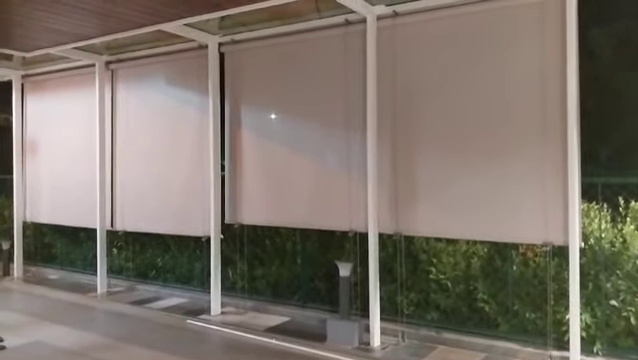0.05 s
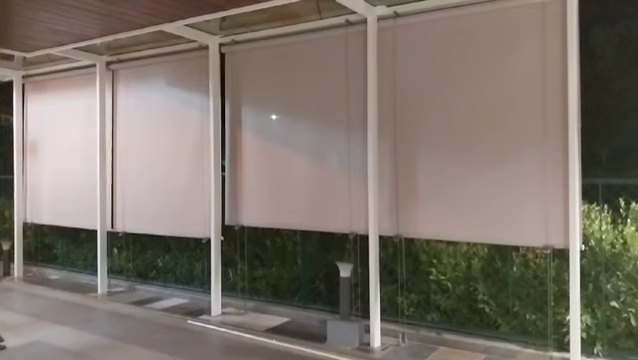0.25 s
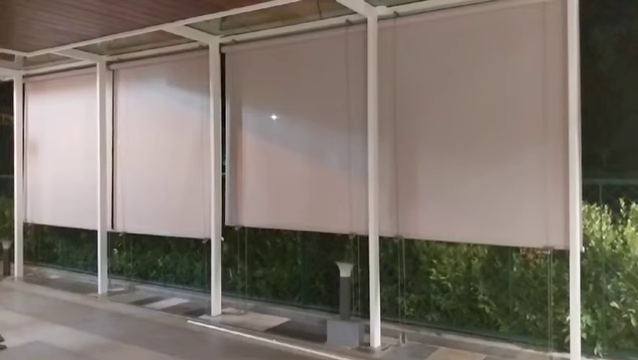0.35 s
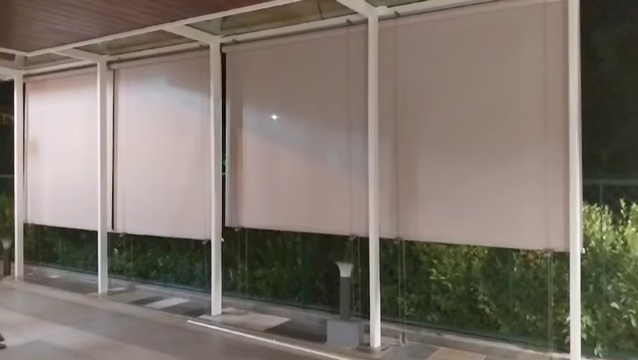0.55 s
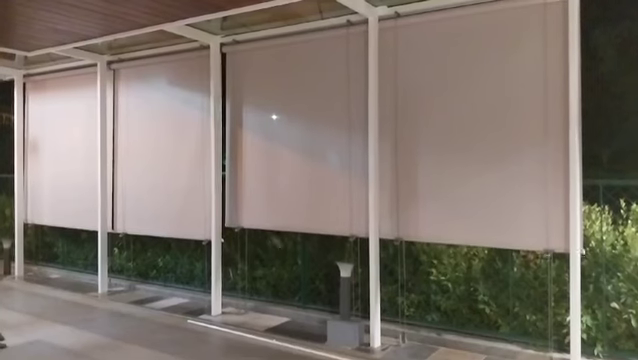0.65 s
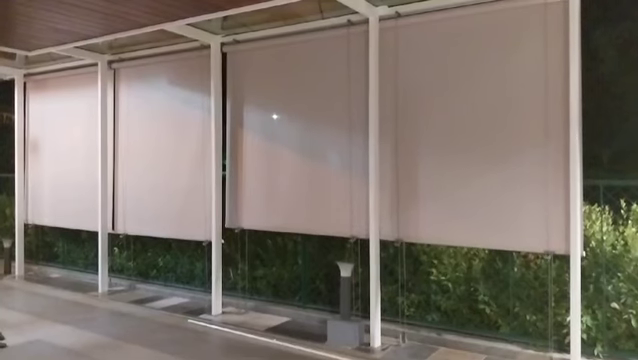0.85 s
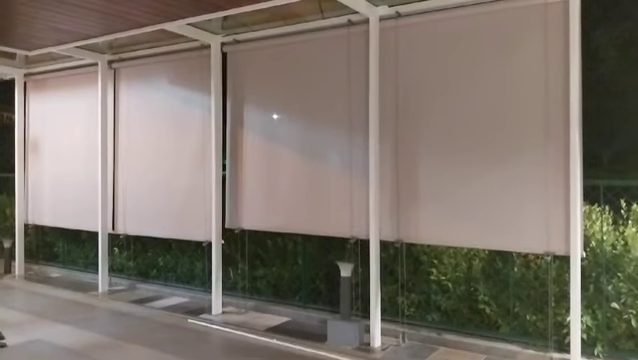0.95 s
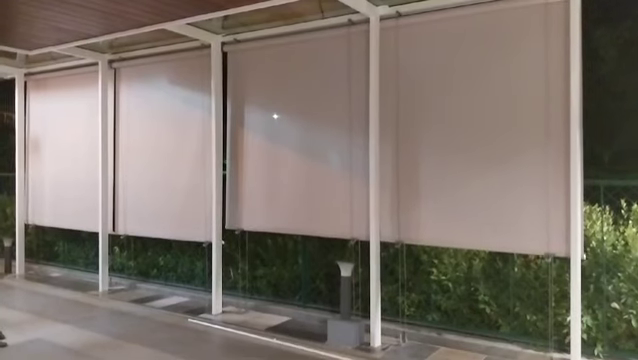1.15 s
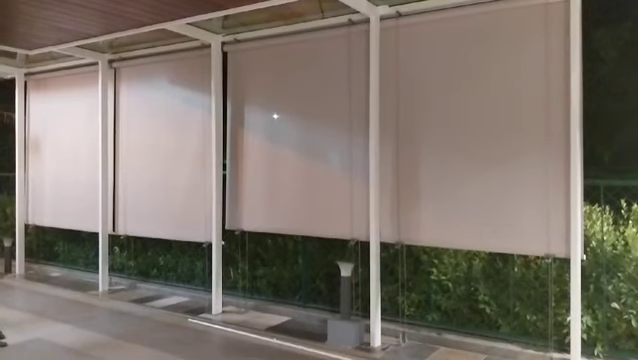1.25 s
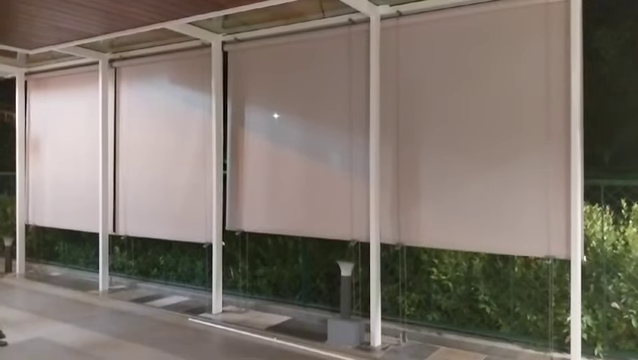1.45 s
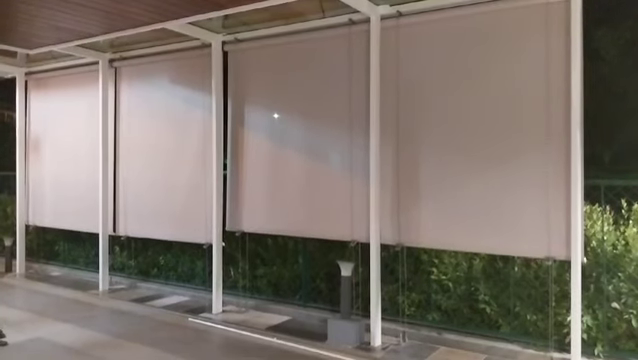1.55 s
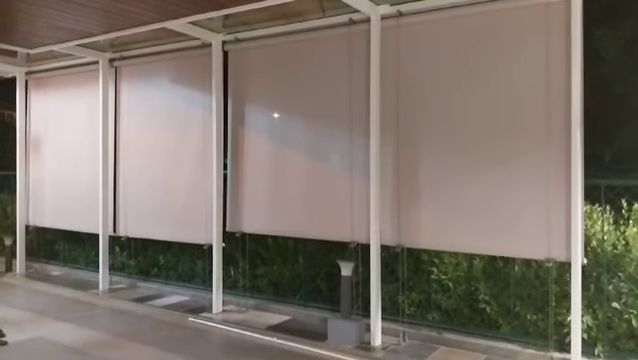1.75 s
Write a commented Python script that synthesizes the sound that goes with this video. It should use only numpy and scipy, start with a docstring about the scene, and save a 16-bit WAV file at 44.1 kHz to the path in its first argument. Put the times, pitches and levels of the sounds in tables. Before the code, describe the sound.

Crickets chirp fast and steadily at night, left of a covered patio, two close and more behind. Under them run a low town rumble and a faint, repeating frog-like call. Early on, the microphone takes one soft bump.

```python
"""Two near crickets chirp at night in a hedge to the left of a covered patio, each chirp a quick pair of
wing strokes that fall in pitch as the scraper slows along the file. Behind them are a chorus of their
kind, one thin, even trill and a dry scrape of wings. Through a low town rumble and airy hiss, something
far off (perhaps a frog) calls faintly. Once, a soft handling bump thuds in the right microphone."""
import sys
import numpy as np
from scipy import signal
from scipy.fft import rfft, irfft, next_fast_len
from scipy.io import wavfile
from scipy.ndimage import map_coordinates

SR = 44100
rng = np.random.default_rng(int(sys.argv[2]) if len(sys.argv) > 2 else 0)


def wav_out(sig):
    """Save sig, one row per channel (or a flat mono array), as 16-bit PCM at SR to the path in sys.argv[1]."""
    wavfile.write(sys.argv[1], SR, np.round(np.clip(np.atleast_2d(sig).T, -1, 1) * 32767).astype(np.int16))


N = 79380
T = np.arange(N) / SR


def amp(db):
    """Decibels to gain."""
    return 10 ** (np.asarray(db) / 20)


def unit(x):
    """Scale to rms 1."""
    return x / np.sqrt(np.mean(x ** 2) + 1e-20)


def wobble(rate):
    """A smooth random modulator, rate knots a second."""
    return map_coordinates(rng.standard_normal(8192), [T * rate], mode="wrap")


def filtered(x, response):
    """Filter x by a gain given as a function of frequency."""
    size = next_fast_len(N + SR // 2)
    return irfft(rfft(x, size) * response(np.fft.rfftfreq(size, 1 / SR)), size)[..., :N]


def coloured(x, eq):
    """Shape x with an EQ curve of (frequency [Hz], gain [dB]) points."""
    points_hz, db = np.transpose(eq)
    return filtered(x, lambda hz: amp(np.interp(np.log(hz + 1), np.log(points_hz), db)))


def noise(eq, alike=0):
    """Stereo noise of rms 1, coloured by eq; alike is the left-right correlation."""
    mid, side = coloured(rng.standard_normal((2, N)), eq)
    width = np.arccos(np.clip(alike, -1, 1)) / 2
    return unit(np.cos(width) * mid + np.sin(width) * np.array([side, -side]))


def cricket(first, rate, gap, start_hz, end_hz, stroke_s=.0165):
    """Two wing strokes a chirp; the tone falls as the scraper slows along the file."""
    song = np.zeros(N)
    rasp = .4 * wobble(800)  # fast phase jitter roughens the tone
    for k, (late, sharp, loud) in enumerate(rng.standard_normal((70, 3))):
        chirp, stroke = divmod(k, 2)
        start = first + chirp / rate + stroke * gap + .0006 * late
        span = slice(*np.searchsorted(T, [start, start + stroke_s]))
        progress = (T[span] - start) / stroke_s
        hz = (start_hz + (end_hz - start_hz) * progress) * (1 + .006 * sharp)
        phase = 2 * np.pi * np.cumsum(hz) / SR + rasp[span]
        swell = np.sin(np.pi * progress ** .85) ** 2
        tone = np.sin(phase) + amp(-46) * np.sin(2 * phase)
        song[span] += amp(1.5 * loud) * swell * tone
    return unit(song)


def patio(song, tail_db, tail_t60, early_db=-4, early_t60=.012):
    """Floor, blinds and roof add quick reflections and a short tail at each microphone."""
    t = T[:SR // 2]
    pre_rolled = np.pad(song, (len(t), 0), mode="wrap")
    wet = 0
    for db, t60 in (early_db, early_t60), (tail_db, tail_t60):
        impulse = rng.standard_normal((2, len(t))) * amp(-60 * t / t60)
        echo = signal.fftconvolve(pre_rolled[None], impulse, axes=1)
        wet += amp(db) * unit(echo[:, len(t):len(t) + N])
    return unit(song + wet)


# Foreground voices: (first chirp [s], chirp rate [1/s], stroke spacing [s], stroke start [Hz],
# stroke end [Hz], pre-EQ level [dB])
NEAR_CRICKETS = [(-.0095, 14.19, .022, 7150, 5450, -43.3), (-.0205, 15.68, .020, 7800, 7050, -52)]

def near_crickets():
    """Two crickets up front, with only a tight patio reverb."""
    return sum(amp(db) * patio(cricket(*voice), tail_db=-4, tail_t60=.09)
               for *voice, db in NEAR_CRICKETS)


def trill(hz=7037):
    """One thin, unbroken insect tone with a slight flutter."""
    tone = np.sin(2 * np.pi * hz * T + .6 * wobble(25))
    return amp(-59) * unit(tone * amp(.89 * wobble(40)))


def chorus(count=6, rate=14.6, start_hz=7350, end_hz=5950):
    """Farther crickets, each at its own pace and pitch, washed in patio reverb."""
    firsts = -(1 + rng.random(count)) / rate
    rates = rate * (1 + .057 * rng.standard_normal(count))
    detunes = 1 + .035 * np.linspace(-1, 1, count)
    songs = sum(cricket(first, pace, .022, start_hz * detune, end_hz * detune)
                for first, pace, detune in zip(firsts, rates, detunes))
    return amp(-45.5) * patio(unit(songs), tail_db=12, tail_t60=.47)


# Bright friction band of the wings: (frequency [Hz], gain [dB])
SCRAPE_EQ = [(3500, -72), (4900, -24.5), (5600, -2), (6500, -1.5), (7500, 5.5), (8300, -26.5), (9200, -13),
             (9600, -19.5), (10300, -42), (15000, -19)]

def wing_scrape():
    """The dry scrape of all the wings, blurred into steady noise."""
    return amp(-49.5) * noise(SCRAPE_EQ)


# How the wings radiate: (frequency [Hz], gain [dB])
WING_EQ = [(4600, -28), (5400, -3.5), (6000, 1), (6350, -1), (6700, -2), (7200, 2), (7600, -2),
           (7900, -1.5), (8250, -10), (12000, 2), (15500, -18)]

def insects(right_db=-28.5):
    """The insect bus: wings colour the chirps, and the camera body shades the right microphone."""
    near, thin_trill, far = near_crickets(), trill(), chorus()
    bus = coloured(near + far, WING_EQ) + thin_trill + wing_scrape()
    return bus * amp([[0], [right_db]])


# Fader ride of the rumble: (time [s], level [dB])
RUMBLE_FADER = [(0, -56.5), (0.18, -50), (0.34, -51), (0.42, -53.5), (0.52, -55.5), (0.6, -54), (0.69, -56),
                (0.79, -53), (0.87, -48), (1.0, -55.5), (1.1, -54.5), (1.18, -50.5), (1.3, -53.5),
                (1.46, -51.5), (1.59, -47.5), (1.66, -52), (1.74, -48)]
# Its bass-heavy colour: (frequency [Hz], gain [dB])
RUMBLE_EQ = [(20, -19), (40, -6.5), (60, -5.5), (105, -0.5), (170, -7), (260, -9.5), (400, -17), (900, -49)]
# Its balance: (left gain [dB], right gain [dB])
RUMBLE_PAN = [-2.5, 4]

def rumble(sway_db=.6):
    """Low town rumble that swells unevenly and leans right."""
    level_db = np.interp(T, *np.transpose(RUMBLE_FADER)) - sway_db * wobble(12.1)
    return amp(level_db) * amp(RUMBLE_PAN)[:, None] * noise(RUMBLE_EQ, alike=.9)


# Night air at each microphone: (frequency [Hz], gain [dB])
AIR_LEFT_EQ = [(300, -4.5), (1300, -1), (1900, 1.5), (3000, -6), (4400, -11), (8200, -14.5), (10500, -21),
               (12500, -10), (14000, -23), (15700, -32)]
AIR_RIGHT_EQ = [(300, -2), (1500, 10), (2800, -17.5), (4500, -32), (8300, -42), (9500, -19), (12000, -4.5),
                (15700, -29)]

def night_air(rise_db_per_s=2.5):
    """A faint rustle of air, slowly fading up."""
    left = amp(-61.5) * noise(AIR_LEFT_EQ)[0]
    right = amp(-74) * noise(AIR_RIGHT_EQ)[1]
    return np.array([left, right]) * amp(rise_db_per_s * (T - T.mean()))


# Dull bed of the town: (frequency [Hz], gain [dB])
TOWN_EQ = [(30, -7.5), (100, -1.5), (250, 0), (370, -2), (520, -4.5), (680, -1), (850, -2), (1000, -13.5),
           (1130, -11), (1300, -26), (2000, -26), (3000, -44), (6000, -65)]

def town_wash():
    """The steady wash of a far town."""
    return amp(-52) * noise(TOWN_EQ, alike=.62)


# Call cues: (start time [s])
FROG_CUES = [.22, .6, 1.0, 1.379, 1.758]
# Hoarse band of the voice: (frequency [Hz], gain [dB])
FROG_EQ = [(500, -51), (740, -12), (810, -5), (885, -4.5), (930, -13), (1200, -56)]

def frog(call_s=.19, pitch_hz=880, rattle_hz=46):
    """A hoarse, rattling far call with a faint pitch, repeating evenly."""
    progress = [np.clip((T - start) / call_s, 0, 1) for start in FROG_CUES]
    swell = sum(np.abs(np.sin(np.pi * call)) ** .5 for call in progress)
    rattle = 1 + .35 * np.sin(2 * np.pi * rattle_hz * T + wobble(20))
    tone = amp(-4) * unit(np.sin(2 * np.pi * pitch_hz * T + wobble(45)))
    voice = tone + noise(FROG_EQ, alike=.22)
    return amp(-56) * swell * unit(rattle * voice)


# Camera body modes: (frequency [Hz], level [dB], 60 dB decay time [s], attack [s])
BODY_MODES = [(98.5, 4.5, 0.074, 0.02), (166, 0.5, 0.028, 0.0077), (223, -13, 0.046, 0.0032),
              (62, -8.5, 0.084, 0.018)]
# Dull puff of the contact: (frequency [Hz], gain [dB])
PUFF_EQ = [(100, 3), (350, -4.5), (500, -12.5), (720, 0), (1000, -26), (2500, -74)]

def handling_bump(start_s=.2272, left_db=-45, puff_attack_s=.0014, puff_t60=.037):
    """A soft knock on the camera: a few low, damped modes and a dull puff, hard right."""
    t = np.maximum(T - start_s, 0)
    ring = np.zeros(N)
    for k, (hz, db, t60, attack) in enumerate(BODY_MODES):
        envelope = amp(db - 60 * t / t60) * (1 - np.exp(-2 * (t / attack) ** 2))
        ring += (-1) ** k * envelope * np.sin(2 * np.pi * hz * t)  # alternating polarity
    puff_envelope = amp(-22 - 60 * t / puff_t60) * (1 - np.exp(-t / puff_attack_s))
    puff = puff_envelope * noise(PUFF_EQ)[0]
    return (ring + puff) * amp([[left_db], [0]])


def scene():
    """The night garden as heard from the patio."""
    return insects() + frog() + handling_bump() + rumble() + night_air() + town_wash()


def record(dry):
    """The camera thins the deepest bass and keeps nothing above its band limit."""
    low_cut_hz, top_hz = 34, 15700
    return filtered(dry, lambda hz: (hz < top_hz) * hz ** 4 / (hz ** 4 + low_cut_hz ** 4))


dry = scene()
out = record(dry)
wav_out(out)
```